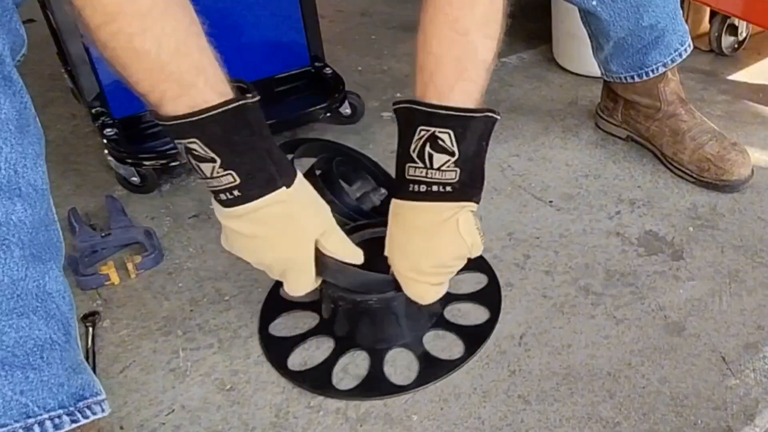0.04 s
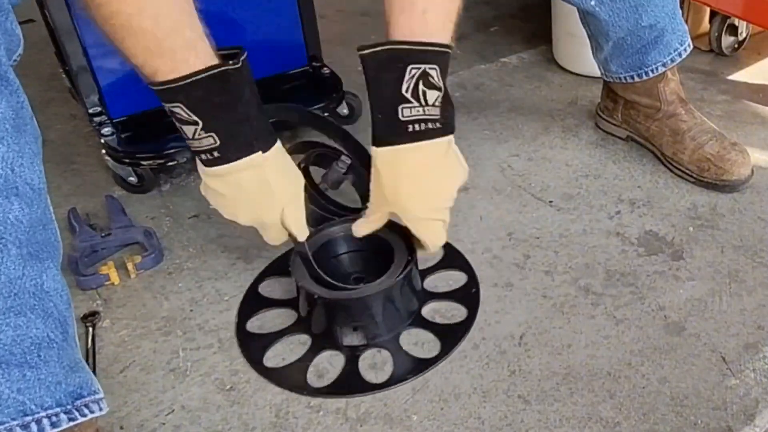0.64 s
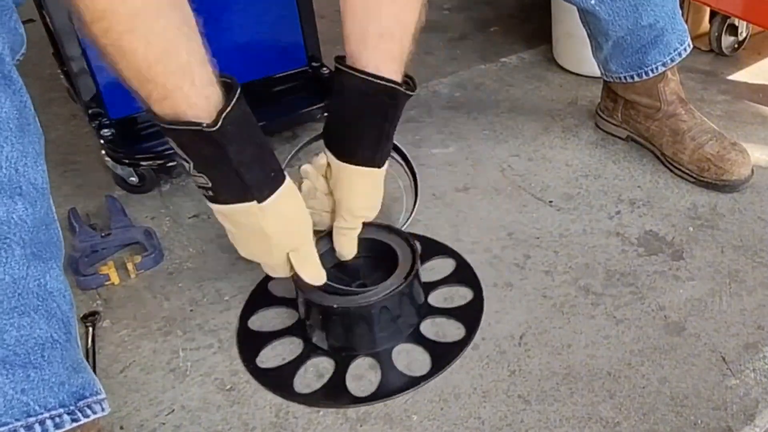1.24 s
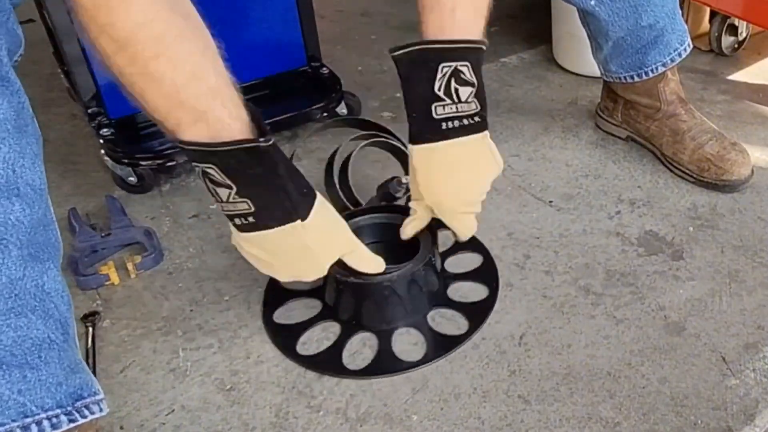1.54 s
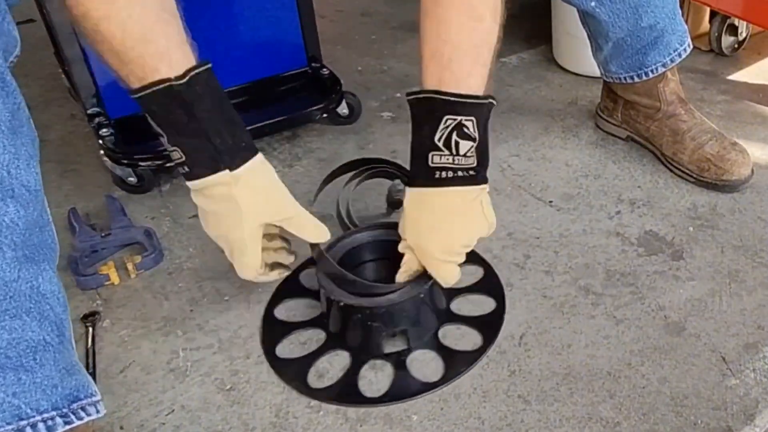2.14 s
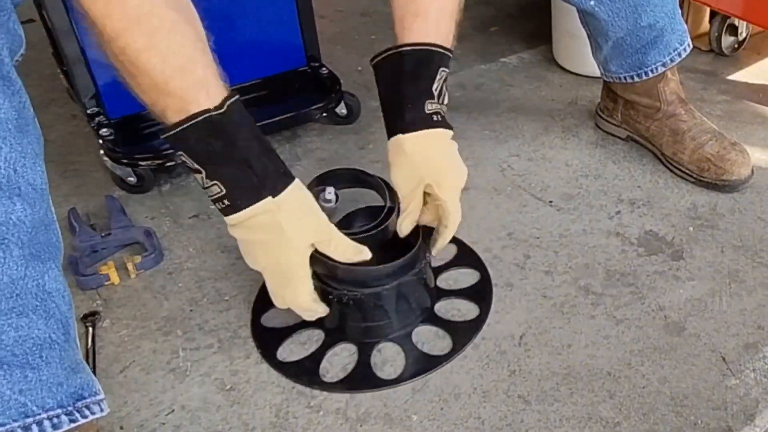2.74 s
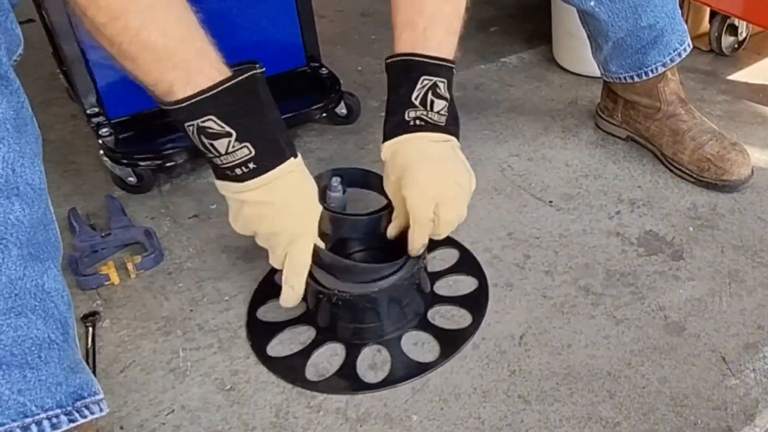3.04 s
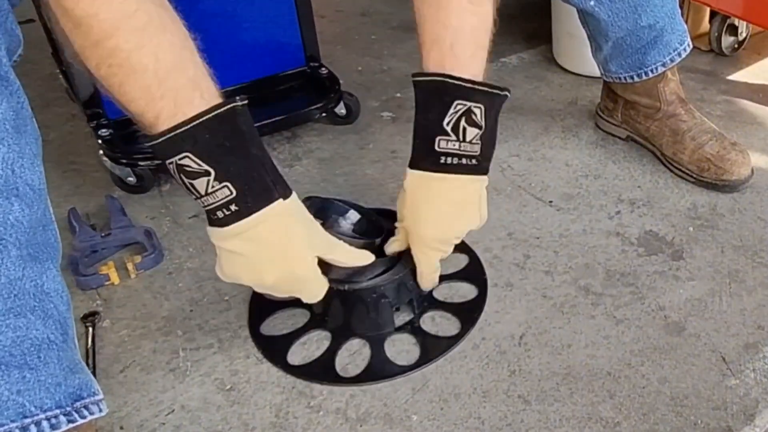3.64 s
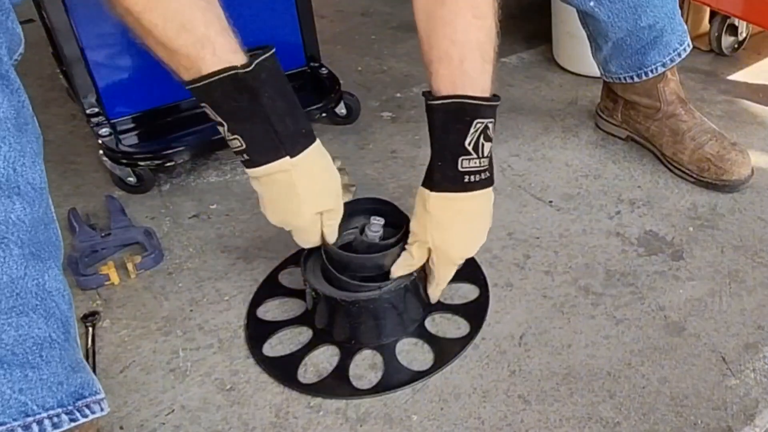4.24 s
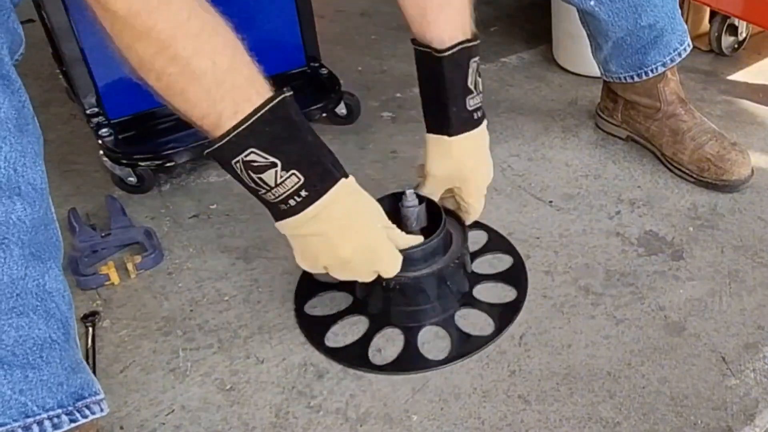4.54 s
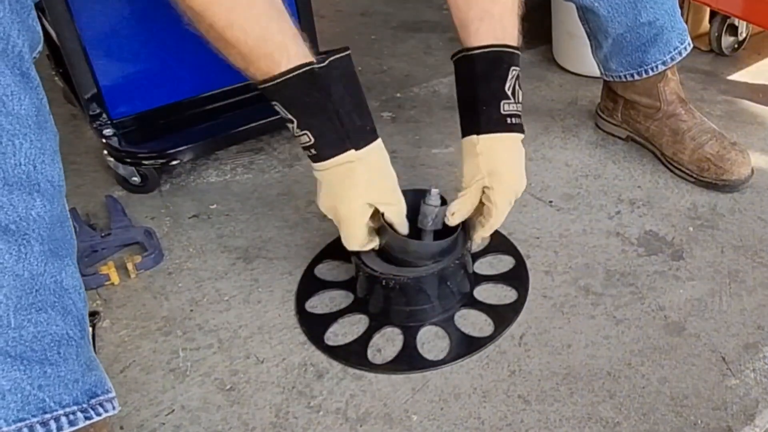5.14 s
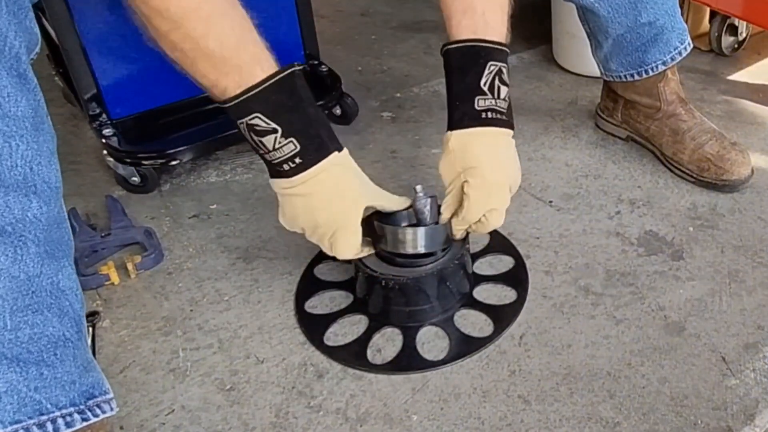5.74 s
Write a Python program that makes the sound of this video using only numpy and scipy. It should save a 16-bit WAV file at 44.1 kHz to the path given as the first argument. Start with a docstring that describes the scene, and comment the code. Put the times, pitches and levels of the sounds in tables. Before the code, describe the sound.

Coiled steel strip scrapes, crackles and snaps in uneven strokes, knocking a plastic housing that shifts on a gritty garage floor.

```python
"""A flat steel spring is wound by gloved hands into a plastic housing on a concrete garage floor.
The strip sticks and slips over its own turns in hissing, gritty strokes; its edge catches, crackles,
squeals and snaps, knocking the hollow housing, which rocks on the floor. Near the end the tight inner
coil jangles and is pressed home. Far off, an engine drones past, sinking in pitch."""
import sys
import numpy as np
from scipy import signal
from scipy.fft import rfft, irfft, next_fast_len
from scipy.io import wavfile
from scipy.ndimage import uniform_filter1d

SR = 44100
rng = np.random.default_rng(int(sys.argv[2]) if len(sys.argv) > 2 else 0)


def wrap_up_sound(samples):
    """Save the sound to the file named by the first command line argument, as 16-bit audio."""
    columns = np.atleast_2d(samples).T
    # keep every value between -1 and 1, then stretch to whole-number steps
    tamed = np.clip(columns, -1, 1)
    steps = np.round(tamed * 32767).astype(np.int16)
    wavfile.write(sys.argv[1], SR, steps)


N = 263718
TIME = np.arange(N) / SR

# Levels in the tables are relative; the functions trim them in the mix.
# Pushes of the hands. Each row: start, swell and fade in seconds, steel hiss and housing hum in dB.
PUSHES = [(0, 0.00066, 0.19, -35, -44), (.04, 0.069, 0.075, -32, -39), (0.113, 0.055, 0.07, -26, -31.5),
          (0.227, 0.011, 0.11, -32.5, -37.5), (0.343, 0.021, 0.049, -34.5, -36.5),
          (0.436, 0.091, 0.045, -39, -42), (0.495, 0.062, 0.05, -28.5, -44.5),
          (0.639, 0.013, 0.014, -41.5, -42), (0.665, 0.1, 0.37, -34, -39.5),
          (0.757, 0.15, 0.04, -31, -35.5), (0.919, 0.014, 0.032, -21, -52),
          (0.961, 0.0048, 0.098, -24, -63), (1.1, 0.045, 0.17, -43.5, -48),
          (1.183, 0.056, 0.09, -30.5, -37.5), (1.32, 0.0055, 0.12, -35.5, -38.5),
          (1.39, 0.12, 0.063, -31, -37.5), (1.531, 0.094, 0.15, -38.5, -39), (1.702, 0.02, 0.17, -26, -33),
          (1.791, 0.1, 0.031, -30.5, -37), (1.957, 0.038, 0.11, -33.5, -36.5),
          (2.053, 0.019, 0.084, -32.5, -36.5), (2.154, 0.053, 0.084, -29, -39),
          (2.35, 0.031, 0.065, -35.5, -38), (2.414, 0.13, 0.051, -38, -42.5),
          (2.581, 0.022, 0.091, -37, -36.5), (2.748, 0.011, 0.14, -53.5, -55),
          (2.92, 0.0048, 0.028, -29, -39.5), (2.971, 0.013, 0.012, -32.5, -41.5),
          (3.024, 0.052, 0.071, -34.5, -31.5), (3.18, 0.058, 0.027, -33.5, -42),
          (3.367, 0.011, 0.037, -44, -47.5), (3.419, 0.033, 0.037, -30.5, -34.5),
          (3.491, 0.041, 0.068, -33, -40.5), (3.763, 0.067, 0.031, -38, -54.5),
          (3.828, 0.022, 0.038, -42, -33), (3.848, 0.077, 0.024, -38.5, -56.5),
          (4.133, 0.017, 0.048, -48.5, -51), (4.21, 0.0052, 0.065, -38, -42.5),
          (4.278, 0.015, 0.026, -30, -38.5), (4.351, 0.066, 0.18, -33, -53),
          (4.551, 0.019, 0.026, -32, -68), (4.652, 0.13, 0.0093, -49, -53),
          (5.074, 0.038, 0.18, -44.5, -48), (5.141, 0.055, 0.055, -36.5, -43.5),
          (5.334, 0.023, 0.072, -36.5, -50), (5.486, 0.005, 0.064, -45.5, -43.5),
          (5.557, 0.013, 0.022, -44.5, -41.5), (5.612, 0.0085, 0.076, -56, -51.5),
          (5.87, 0.017, .04, -49, -51), (5.954, 0.031, 0.036, -46.5, -48.5)]
# Colour of steel sliding on steel. Each row: frequency in Hz, level in dB.
HISS_COLOUR = [(100, -49), (1000, -15), (3300, -10), (5000, -8), (7000, -6), (10000, -6.5), (13000, -5),
               (15500, -3), (20000, -13.5)]
# How the spring sits. Each row: time in seconds, housing pitch factor, hiss tilt in dB per octave.
SEATING = [(0, 1.045, 3), (.21, 0.96, 4), (.28, 1.2, 4.5), (.36, 1.07, 8), (.58, 1.077, -0.5),
           (.8, 0.98, 6), (1.25, 1.06, 5.5), (1.68, 0.99, 1), (1.83, 1.033, 5), (2.4, 0.97, 5.5),
           (2.51, 0.98, 3), (2.63, 0.97, 2), (3.08, 1.008, 2), (3.25, 0.96, 5.5), (3.43, 1.016, 6.5),
           (3.53, 0.99, 3), (3.88, 0.94, 4.5), (4.28, 0.91, -4.5), (4.42, 0.86, 4.5), (4.75, 0.94, -5.5),
           (4.93, 0.89, -13), (5.18, 1.18, -5.5), (5.38, 0.88, -7), (5.62, 0.86, -11), (5.95, 0.74, -5)]
# Resonances of the housing, its base plate and the coil. Each row: pitch and width in Hz, level in dB.
HOUSING_MODES = [(845, 72, -27.5), (1493, 267, -11.5), (1611, 70, -4.5), (1785, 76, 0.5), (2057, 103, 3),
                 (2201, 187, 1), (2277, 810, -11.5), (3137, 42, -9)]
BASE_MODES = [(730, 410, 3), (1270, 150, 12)]
COIL_MODES = [(1450, 30, -3), (2045, 28, 2), (2645, 38, 1), (3110, 40, -4), (3945, 40, -4), (4175, 35, 0),
              (4370, 40, 3), (4737, 32, -3), (5169, 40, -3), (4200, 600, -5), (8400, 900, -11)]
# The housing shifts on the gritty floor. Each row: time in seconds, level in dB.
FLOOR_SHIFTS = [(0, -34.5), (.2, -33), (.4, -34), (.9, -33.5), (1.3, -35.5), (2.4, -39), (3.3, -35.5),
                (4.5, -35), (5.2, -36.5), (5.98, -32.5)]
# Colours of the floor grit and the room tone. Each row: frequency in Hz, level in dB.
GRIT_COLOUR = [(15, -7), (45, 0.5), (130, 2), (480, 4.5), (780, 4.5), (1300, 2.5), (2200, 4.5), (4000, 6),
               (16000, -37.5)]
AIR_COLOUR = [(20, -42), (90, -29), (170, -11), (290, -1), (400, -1), (580, -10), (2200, -9), (4000, -16),
              (16000, -22)]
# The garage's early echoes. Each row: frequency in Hz, seconds to fall by 60 dB.
ECHO_DECAY = [(250, 0.064), (700, 0.068), (1800, 0.055), (4600, 0.036), (12000, 0.063)]
# The strip lets go. Each row: start in seconds, steel tick in dB, tick centre in Hz, housing knock in dB.
SNAP_HITS = [(.0845, -29.5, 11500, -36), (0.136, -35.5, 11500, -26), (0.19, -25.5, 9800, -40),
             (0.2137, -23.5, 9700, -43.5), (0.351, -47, 8950, -32.5), (0.3556, -25, 12500, -61),
             (0.4432, -47, 9400, -38.5), (0.5027, -22.5, 9300, -34), (0.525, -36.5, 12600, -43),
             (0.543, -27, 11700, -51.5), (0.572, -26.5, 10200, -20), (1.0936, -22.5, 13400, -55),
             (1.1962, -31.5, 11300, -27.5), (1.221, -34, 9000, -22.5), (1.277, -26, 11300, -24),
             (1.356, -31, 11600, -39), (1.4701, -30.5, 11100, -20.5), (1.485, -26, 11600, -20.5),
             (1.6262, -30.5, 11700, -38), (1.8115, -26, 12000, -34.5), (1.838, -30, 12100, -47),
             (2.0752, -26.5, 12000, -38), (2.3432, -44, 10900, -49), (2.38, -36, 11800, -37),
             (2.582, -47, 10500, -37), (2.598, -29.5, 9450, -29.5), (2.754, -45, 8240, -44.5),
             (2.784, -46, 10300, -44.5), (2.831, -55, 8000, -50.5), (2.8629, -43.5, 7700, -45.5),
             (3.0671, -21.5, 7460, -18), (3.1175, -39.5, 7600, -32.5), (3.1506, -54, 8100, -53),
             (3.246, -31, 8900, -26), (3.337, -51, 5340, -32.5), (3.362, -42, 8400, -32),
             (3.38, -49, 5800, -60), (3.4201, -27, 9000, -19.5), (3.4456, -27.5, 12450, -42.5),
             (3.4685, -31, 9200, -25), (3.7207, -52.5, 7900, -48), (3.802, -27.5, 7300, -30.5),
             (3.812, -32, 8000, -30), (3.8192, -28, 5430, -25), (3.8342, -36, 5600, -27.5),
             (3.842, -28.5, 5000, -22.5), (3.845, -31.5, 6020, -27), (3.8481, -31, 4000, -23.5),
             (4.0364, -49, 5200, -50.5), (4.082, -49.5, 7160, -50), (4.209, -40, 4500, -46),
             (4.229, -54, 4500, -39), (4.267, -46, 4600, -41), (4.274, -41, 6000, -33.5),
             (4.2853, -36, 5500, -42), (4.2941, -33, 5000, -40), (4.6638, -43, 8060, -40.5),
             (4.925, -30, 10370, -39.5), (5.1746, -36.5, 7500, -53), (5.354, -38, 8400, -40),
             (5.3729, -34, 7850, -23.5), (5.3769, -31.5, 8700, -20.5), (5.4891, -38.5, 9000, -41),
             (5.6269, -54.5, 6400, -38), (5.753, -60, 8900, -53.5), (5.894, -38, 10800, -42.5)]
# The edge skips over the turns. Each row: start and length in seconds, level in dB.
CRACKLE_RUNS = [(0.143, 0.017, -30.5), (0.238, 0.025, -28.5), (0.9364, 0.01, -22), (0.9668, 0.014, -28.5),
                (1.002, 0.0038, -38), (1.03, 0.0059, -30), (1.054, 0.015, -33.5), (1.325, 0.013, -35),
                (1.487, 0.014, -33.5), (1.733, 0.0073, -28), (1.758, 0.0098, -35), (2.007, 0.026, -26.5),
                (2.378, 0.011, -28.5), (4.621, 0.011, -41)]
# The housing rocks onto the floor. Each row: start in seconds, crunch in dB, thud in dB.
FLOOR_BUMPS = [(0.191, -34, -62), (0.2141, -40.5, -37.5), (0.542, -35.5, -45), (0.935, -35.5, -40),
               (1.029, -46.5, -56), (1.766, -39, -43), (2.014, -44, -46), (2.075, -46, -54),
               (2.5974, -41.5, -53), (2.9276, -51.5, -58), (4.9249, -47, -55)]
# Steel edges squeal. Each row: start and length in seconds, centre pitch in Hz, level in dB.
EDGE_SQUEAKS = [(0.251, 0.07, 2610, -36), (0.498, 0.022, 3620, -30.5), (3.841, 0.016, 4315, -28),
                (4.281, 0.0074, 4450, -29), (4.387, 0.065, 1536, -42.5), (5.3535, 0.0035, 7620, -18)]
# The engine's pass. Each row: time in seconds, level in dB, pitch factor.
ENGINE_PASS = [(2.6, -78, 1.1), (4.1, -72, 1.06), (4.45, -68, 1.02), (4.75, -68, 1), (5.05, -68, .98),
               (5.35, -68, .955), (5.98, -75, .92)]
# Its tones. Each row: base pitch in Hz, level in dB, centre and half-width of the swell in seconds.
ENGINE_TONES = [(179, -4, 5.2, .35), (289, 6, 4.6, .24), (392, -2, 4.8, .7), (797, 3, 5.25, .3)]
# The inner coil rings when it swings free. Each row: time in seconds, send to the coil in dB.
COIL_FREEDOM = [(0, -29.5), (3.75, -18.5), (3.83, 2), (3.93, -0.5), (4.3, 0.5), (4.4, -6.5), (5.2, -4),
                (5.36, -35), (5.98, -13)]


def amp(db):
    return 10 ** (np.asarray(db) / 20)


def unit(x):
    """Scales to rms 1."""
    return x / np.sqrt(np.mean(x ** 2) + 1e-20)


def hit_sized(x, hit_s=.005):
    """Gives a hit the energy of rms 1 held for hit_s."""
    return x * np.sqrt(hit_s * SR) / np.linalg.norm(x)


def curves(rows):
    """Each column of a time table as an automation curve."""
    s, *columns = np.transpose(rows)
    return [np.interp(TIME, s, c) for c in columns]


def read(points, hz):
    """Reads a curve on a log-frequency axis."""
    f, value = np.transpose(points)
    return np.interp(np.log(hz + 1), np.log(f + 1), value)


def add(mix, s, sound):
    part = mix[max(round(s * SR), 0):][:len(sound)]
    part += sound[:len(part)]


def band(x, low_hz, high_hz, order=2):
    edges = np.clip([low_hz, high_hz], 20, SR / 2 - 100)
    return signal.sosfilt(signal.butter(order, edges, "band", fs=SR, output="sos"), x)


def colour(x, spectrum, size=2048):
    """Causal EQ of unit energy with the given spectrum."""
    log_gain = np.log(amp(read(spectrum, abs(np.fft.fftfreq(size, 1 / SR)))))
    taps = np.fft.ifft(np.exp(np.conj(signal.hilbert(log_gain)))).real[:size // 2]
    return signal.oaconvolve(x, taps / np.linalg.norm(taps))[:len(x)]


def wander(rate_hz):
    """Random drift of rms 1, up to the given rate."""
    size = next_fast_len(N)
    hz = np.fft.rfftfreq(size, 1 / SR)
    spectrum = rfft(rng.standard_normal(size)) / (1 + (hz / rate_hz) ** 4)
    return unit(irfft(spectrum)[:N])


def ring(x, modes, pitch, size=6000):
    """A resonator with modes of alternating sign, bent by running its clock at the pitch factor."""
    t = TIME[:size]
    click = sum((-1) ** k * amp(db) * width * np.exp(-np.pi * width * t) * np.sin(2 * np.pi * hz * t)
                for k, (hz, width, db) in enumerate(modes))
    clock = np.cumsum(pitch)
    steps = np.arange(1, clock[-1])
    rung = signal.oaconvolve(np.interp(steps, clock, x), click / np.linalg.norm(click))[:len(steps)]
    return np.interp(clock, steps, rung)


def burst(decay_s, size=1024, crack=2.2):
    """One hard contact, then a spray of tiny ones that dies fast."""
    age = TIME[:size] / decay_s
    return rng.standard_normal(size) * (np.exp(-age) + crack * np.exp(-2 * np.pi * age))


def strokes(fade_db=-20.5, stop_db_per_s=599.5):
    """Hiss and hum envelopes in dB: each push gathers speed, slows ever faster, then sticks."""
    power = np.full((2, N), amp(-95) ** 2)
    for start, swell_s, fade_s, hiss_db, hum_db in PUSHES:
        t = TIME[TIME < 2 * (swell_s + fade_s)]
        swell = np.sin(np.pi / 2 * np.minimum(t / swell_s, 1)) ** .78
        slowing = (np.maximum(t - swell_s, 0) / fade_s) ** 1.24
        stopped_s = np.maximum(t - swell_s - fade_s, 0)
        speed = swell * amp(fade_db * slowing - stop_db_per_s * stopped_s)
        add(power[0], start, (amp(hiss_db) * speed) ** 2)
        add(power[1], start, (amp(hum_db) * speed) ** 2)
    return 10 * np.log10(power)


def friction(slips_per_s=420, spread_db=4, slip_s=.0009, smooth=.7, judder_db=2.2, judder_hz=110):
    """Stick and slip: the contact force comes in brief uneven bursts over steady sliding."""
    sizes = np.minimum(rng.exponential(1, N), 2.8)
    slips = (rng.random(N) < slips_per_s / SR) * amp(spread_db * sizes)
    bursts = unit(signal.lfilter([1], [1, -np.exp(-1 / (slip_s * SR))], slips))
    return unit((smooth + bursts) * amp(judder_db * wander(judder_hz)))


def hiss(force, slide_db, tilt, stall_db=1.7, patch_db=3, pivot_hz=10000):
    """Steel slides on steel; the contact point wanders, so its colour keeps shifting."""
    level_db = slide_db + .38 + stall_db * wander(45)  # the strip hesitates and hurries on
    source = colour(force * rng.standard_normal(N), HISS_COLOUR)
    hz, t, frames = signal.stft(source, SR, nperseg=256)
    patches = uniform_filter1d(rng.standard_normal(frames.shape), size=6, axis=0)
    patches = unit(uniform_filter1d(patches, size=7, axis=1))
    octaves = np.log2(np.maximum(hz, 6000) / pivot_hz)[:, None]
    gain = amp(octaves * np.interp(t, TIME, tilt) + patch_db * patches)
    power = amp(read(HISS_COLOUR, hz))[:, None] ** 2
    gain /= np.sqrt((power * gain ** 2).sum(0) / power.sum())  # the colour moves, the power holds
    return amp(level_db) * signal.istft(frames * gain, SR, nperseg=256)[1][:N]


def chatter(slide_db, taps_per_s=75, tap_db=-9, follows=.8, tap_s=.0016):
    """Loose turns tap each other at random, standing out most when the strip slides gently."""
    contacts = rng.random(N) < taps_per_s / SR
    taps = contacts * amp(follows * slide_db + tap_db + 2 * rng.standard_normal(N))
    fading = signal.lfilter([1], [1, -np.exp(-1 / (tap_s * SR))], taps * (slide_db > -62))
    return fading * unit(band(rng.standard_normal(N), 5500, 17000, order=1))


def rubbing(force, hum_db, catches_per_s=320, waver_db=2.5):
    """The strip's edge plucks the housing in small separate catches over a bed of scraping."""
    catches = (rng.random(N) < catches_per_s / SR) * rng.choice([-1, 1], N) * rng.uniform(.26, 1, N)
    scrape = .5 * force * rng.standard_normal(N)
    return amp(hum_db - 1.4 + waver_db * wander(25)) * (unit(catches) + scrape)


def housing(drive, seat_pitch, waver):
    """Hollow plastic rings; pressed home, the coil lowers its pitch and passes blows to the base plate."""
    shell = ring(band(drive, 1015, 3200), HOUSING_MODES, seat_pitch * waver)
    seated = np.clip(1 - seat_pitch, 0, 1)
    plate = ring(band(drive * seated, 340, 2000), BASE_MODES, pitch=np.ones(N))
    return shell + amp(7) * plate


def floor_grit(force, slide_db, skips, follows=.52, clack_db=-13):
    """The housing grinds on the concrete with each stroke and clacks with each crackle."""
    level_db = curves(FLOOR_SHIFTS)[0] + follows * slide_db
    grinding = amp(level_db) * force * rng.standard_normal(N)
    return colour(grinding + amp(clack_db) * skips, GRIT_COLOUR)


def room_tone(level_db=-64.5, swell_db=1):
    """The low, steady bed of the garage."""
    return amp(level_db + swell_db * wander(4.6)) * colour(rng.standard_normal(N), AIR_COLOUR)


def reflections(wet_db=-6, late_db=-28, late_t60=.31, first_s=.0023, size=16384):
    """Quick echoes from the floor and nearby things, then a faint longer tail."""
    t = TIME[:size]
    taps = rng.standard_normal(size) * (rng.random(size) < 4000 / SR) * (t > first_s)
    hz, frame_s, frames = signal.stft(taps, SR, nperseg=128)
    decay = amp(-60 * frame_s / read(ECHO_DECAY, hz)[:, None])
    near = signal.istft(frames * decay, SR, nperseg=128)[1][:size]
    late = band(rng.standard_normal(size), 150, 4000, order=1) * amp(-60 * t / late_t60)
    return amp(wet_db) * near / np.linalg.norm(near) + amp(late_db) * late / np.linalg.norm(late)


def garage(x, turns_per_s=.743, count=3):
    """Crossfaded reverbs: the echo paths keep changing as the hands and the spring move."""
    sends = [np.sqrt(2 / count) * np.cos(np.pi * (turns_per_s * TIME + k / count)) for k in range(count)]
    return sum(signal.oaconvolve(x * send, reflections())[:N] for send in sends)


def snaps(tick_s=.0033, width_ratio=1.575, wide_db=-9):
    """The strip catches and lets go: a bright steel tick and a blow to the housing."""
    ticks, knocks = np.zeros((2, N))
    for s, tick_db, hz, knock_db in SNAP_HITS:
        spray = burst(tick_s)
        tick = band(spray, hz / width_ratio, hz * width_ratio) + amp(wide_db) * band(spray, 1700, 23000)
        add(ticks, s, amp(tick_db) * hit_sized(tick))
        add(knocks, s, amp(knock_db) * hit_sized(np.ones(1)))
    return ticks, knocks


def crackles(skips_per_s=700, spread_db=4, skip_s=.00032, fade_db=-4):
    """The edge skips over the turns in runs of sharp, uneven clicks, each run opening with a catch."""
    power = np.zeros(N)
    for s, length, db in CRACKLE_RUNS:
        t = TIME[TIME < length]
        skips = (rng.random(N)[:len(t)] < skips_per_s / SR) | (t == 0)
        sizes = skips * amp(spread_db * rng.uniform(-.89, 1, N)[:len(t)] + fade_db * t / length)
        add(power, s, (amp(db) * unit(sizes)) ** 2)
    pole = np.exp(-1 / (skip_s * SR))
    return np.sqrt(signal.lfilter([1 - pole], [1, -pole], power)) * rng.standard_normal(N)


def bumps():
    """Short, dry crunches of the housing on the concrete, each over a dull thud."""
    out = np.zeros(N)
    thud = hit_sized(band(signal.unit_impulse(2048), 45, 330))
    for s, crunch_db, thud_db in FLOOR_BUMPS:
        crunch = band(colour(burst(decay_s=.0035), GRIT_COLOUR), 200, 10000, order=1)
        add(out, s, amp(crunch_db + 5.5) * hit_sized(crunch))
        add(out, s, amp(thud_db) * thud)
    return out


def squeaks(arch=.062, octave_db=-9, rough_db=4):
    """Steel edges catch in brief rough tones whose pitch rises and falls with the pressure."""
    out = np.zeros(N)
    jitter = .075 * wander(800)
    grip = unit(amp(rough_db * wander(450)))
    for start, length, hz, db in EDGE_SQUEAKS:
        t = TIME[TIME < length]
        pressure = np.sin(np.pi * t / length)
        pitch = hz * (1 + arch * (pressure - .5) + np.interp(start + t, TIME, jitter))
        phase = 2 * np.pi * np.cumsum(pitch) / SR
        add(out, start, amp(db) * pressure * (np.sin(phase) + amp(octave_db) * np.sin(2 * phase)))
    return out * grip


def far_engine():
    """A few wavering tones sink in pitch as the engine passes, swelling and fading in turn."""
    level_db, pitch = curves(ENGINE_PASS)
    out = np.zeros(N)
    for hz, db, centre_s, half_width_s in ENGINE_TONES:
        cycles = np.cumsum(hz * pitch * (1 + .006 * wander(15))) / SR
        swell = amp(level_db + db + 2.2 * wander(9)) / (1 + ((TIME - centre_s) / half_width_s) ** 4)
        out += swell * np.sqrt(2) * np.sin(2 * np.pi * cycles)
    return out


def coil_jangle(drive, force, slide_db, ticks, rub_db=-9, tick_db=-9):
    """The inner coil rings, shaken by the housing and by the strip rubbing and snapping on it."""
    squeeze = 1 + .002 * wander(14)  # the grip detunes it slightly
    rub = amp(slide_db + rub_db) * force * rng.standard_normal(N)
    shake = (drive + rub + amp(tick_db) * ticks) * amp(curves(COIL_FREEDOM)[0])
    return ring(band(shake, 1300, 12000), COIL_MODES, squeeze)


def spring(tick_db=1.5, knock_db=-1.5):
    """Friction, snaps and crackles sound the strip, the housing, the inner coil and the floor."""
    slide_db, hum_db = strokes()
    seat_pitch, tilt = curves(SEATING)
    waver = 1 + .032 * wander(18)  # the housing's ring wavers as the point of contact shifts
    force = friction()
    ticks, knocks = snaps()
    skips = crackles()
    drive = rubbing(force, hum_db) + amp(knock_db) * knocks
    coil = coil_jangle(drive, force, slide_db, ticks)
    grit = floor_grit(force, slide_db, skips)
    sliding = hiss(force, slide_db, tilt) + chatter(slide_db)
    clicks = amp(tick_db) * ticks + colour(skips, HISS_COLOUR)
    return sliding + clicks + housing(drive, seat_pitch, waver) + coil + grit + bumps() + squeaks()


def scene():
    """The spring in the garage, with the engine and room tone behind it, all panned hard right."""
    work = spring()
    right = amp(4.5) * (work + garage(work)) + far_engine() + room_tone()
    return np.array([np.zeros(N), right])


def record(dry, cutoff_hz=15800):
    """A steep low-pass trims the top of the hiss."""
    taps = signal.firwin(511, cutoff_hz, window=("kaiser", 9), fs=SR)
    return signal.oaconvolve(dry, taps[None], "same")


dry = scene()
out = record(dry)
wrap_up_sound(out)
```